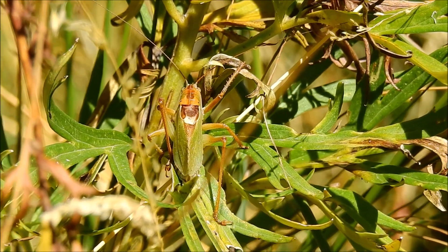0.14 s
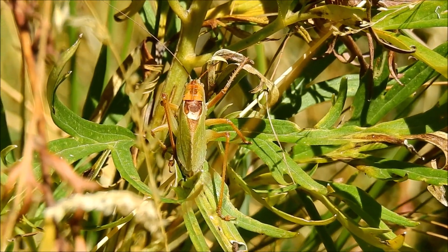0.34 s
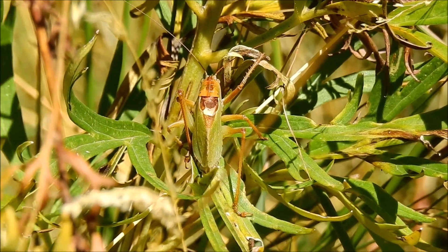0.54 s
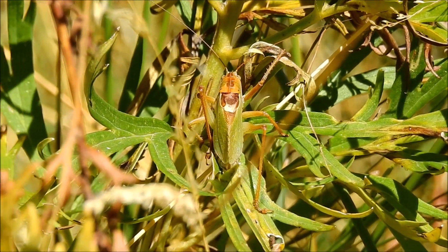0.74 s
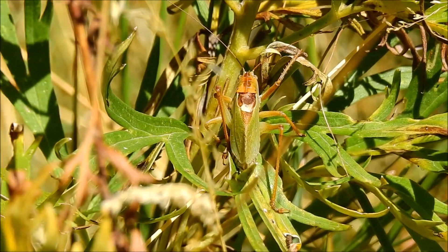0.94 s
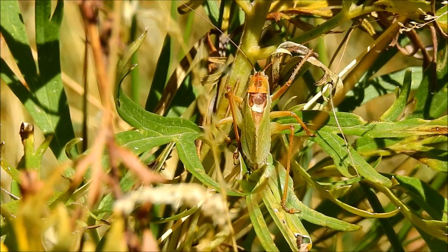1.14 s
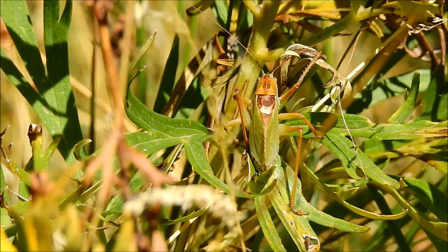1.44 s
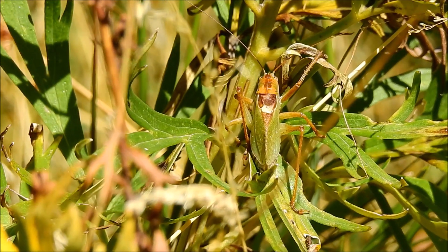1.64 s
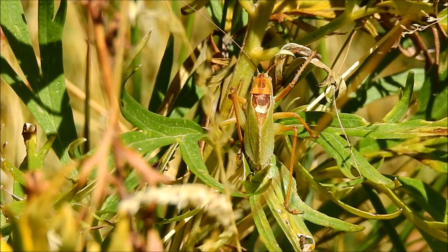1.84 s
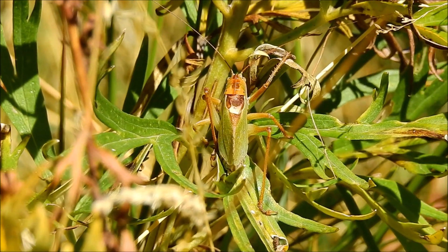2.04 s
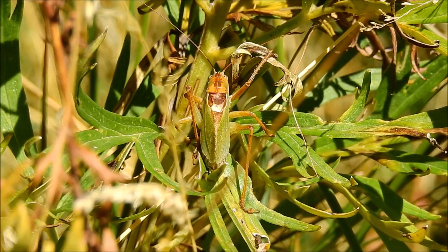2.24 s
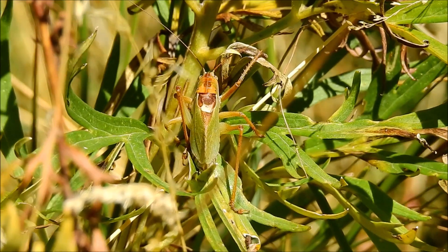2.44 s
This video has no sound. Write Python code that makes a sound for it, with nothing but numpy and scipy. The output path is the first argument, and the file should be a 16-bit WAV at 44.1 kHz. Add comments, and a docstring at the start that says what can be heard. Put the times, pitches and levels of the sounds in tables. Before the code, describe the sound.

A bush-cricket's rapid pulsed high buzz swells then stops, over fainter insects and wind thumps

```python
"""Wind thumps two microphone ports from the start, while a bird gives gliding whistles for 0.7 s.
A bush-cricket draws scraper over file about 29 times a second, growing louder until it stops at 1.7 s.
A neighbour, with its own tooth clicks and a narrower song, sings from 0.15 s to 2.1 s.
Two far crickets, with their own stroke rates, grow prominent towards the end; a hollow tap falls at 2.1 s.
Filtered noise forms a hush and an insect chorus throughout, and a rustle that swells at the close."""
import sys
import numpy as np
from scipy import signal
from scipy.fft import rfft, irfft
from scipy.io import wavfile
from scipy.ndimage import uniform_filter1d

SR = 44100
rng = np.random.default_rng(int(sys.argv[2]) if len(sys.argv) > 2 else 0)


def wav_record(signal):
    """Record a signal, one row per channel, as 16-bit PCM in the file named by sys.argv[1]."""
    frames = np.transpose(np.atleast_2d(signal))
    bounded = np.clip(frames, -1, 1)
    # unit amplitude maps onto the largest positive 16-bit level
    quanta = np.round(bounded * 32767).astype(np.int16)
    wavfile.write(sys.argv[1], SR, quanta)


N = 114660
TIME = np.arange(N) / SR


def from_db(db):
    """Logarithmic level: decibels become an amplitude ratio."""
    return 10 ** (np.asarray(db) / 20)


def rms_one(x):
    """Normalisation: scale to a root-mean-square of 1."""
    return x / np.sqrt(np.mean(x ** 2) + 1e-20)


def in_time(rows):
    """Linear interpolation: a two-column curve at every sample."""
    return np.interp(TIME, *np.transpose(rows))


def bump(s, length):
    """Gaussian envelope of height 1 centred on s, down to exp(-2) at one length either side."""
    return np.exp(-2 * ((TIME - s) / length) ** 2)


def noise(spectrum):
    """Spectral shaping: two independent white noises take on the given spectrum; joint rms 1."""
    hz, db = np.transpose(spectrum)
    bins = np.maximum(np.arange(N // 2 + 1) * SR / N, 1)
    gain = from_db(np.interp(np.log(bins), np.log(hz), db))
    # beyond the listed frequencies the amplitude falls by 12 dB an octave
    gain = gain * np.minimum(bins / hz[0], 1) ** 2 * np.minimum(hz[-1] / bins, 1) ** 2
    return rms_one(irfft(rfft(rng.standard_normal((2, N))) * gain, N))


def spread(pair, side_db):
    """Stereo by sum and difference: one noise is the middle, the other the side."""
    middle, side = pair
    return rms_one(middle + from_db(side_db) * side * np.array([[1], [-1]]))


def resonate(x, hz, width):
    """Resonance: a steep-sided band passes while the rest is rejected."""
    band = [hz - width / 2, hz + width / 2]
    return signal.sosfilt(signal.butter(2, band, "band", fs=SR, output="sos"), x)


def evened(x, size):
    """Envelope division: the running rms over size samples is held near 1."""
    power = uniform_filter1d(np.abs(signal.hilbert(x)) ** 2, size) / 2
    return x / np.sqrt(power + 1e-12)


def stroke_times(pace):
    """Phase accumulation: the moment at which the stroke count reaches each whole number."""
    s, made = np.transpose(pace)
    return np.interp(np.arange(made[-1] + 1), made, s)


def tooth_clicks(teeth_per_s, rough_db, jitter=.25):
    """Impulse excitation: file teeth of uneven spacing and height click one after another."""
    gaps = np.exp(jitter * rng.standard_normal(N // 10)) / teeth_per_s
    teeth = (np.cumsum(gaps) * SR).astype(int)
    heights = from_db(rough_db * np.clip(rng.standard_normal(len(teeth)), -2, 2))
    return rms_one(np.bincount(teeth, heights, N)[:N])


def stridulate(strokes, wing, rise_s, fall_s, teeth_per_s, rough_db, scatter_db, tail_s,
               bass_lag_s=0, uneven_db=1.16):
    """Source and resonator: swelling strokes of clicks, part blurred by foliage to hiss, drive the wing."""
    clicks = tooth_clicks(teeth_per_s, rough_db)
    nearest = np.searchsorted((strokes[1:] + strokes[:-1]) / 2, TIME)
    strength = from_db(uneven_db * rng.standard_normal(len(strokes)))[nearest]
    wet = from_db(scatter_db)
    keep = np.exp(-1 / (tail_s * SR))
    scatter = wet * rng.standard_normal((2, N))   # different on each side

    hz, db = np.transpose(wing)
    bins = np.arange(N // 2 + 1) * SR / N
    response = rms_one(from_db(np.interp(bins, hz, db)) * np.minimum(bins / hz[0], 1) ** 2)

    spectrum = 0
    low = np.interp(bins, [7400, 8400], [1, 0])   # the lower part may come late in the stroke
    for band, delay in ((low, bass_lag_s), (1 - low, 0)):
        since = TIME - strokes[nearest] - delay
        rise = (since / rise_s) ** 2
        fall = np.abs(since / fall_s) ** 3
        pressure = strength * np.exp(-.5 * np.where(since < 0, rise, fall))
        # the blurred power decays exponentially with time constant tail_s
        blurred = np.sqrt(signal.lfilter([1 - keep], [1, -keep], pressure ** 2 + 1e-18))
        spectrum = spectrum + rfft(pressure * clicks + blurred * scatter) * band
    return irfft(spectrum * response, N) / np.hypot(1, wet)


# the near cricket's pace: t/s, strokes made so far
NEAR_PACE = [(.0206, 0), (.1561, 4), (.2968, 8), (.5407, 15), (.6065, 17), (.7783, 22), (1.1586, 33),
             (1.333, 38), (1.5467, 44), (1.6228, 46), (1.7315, 49)]
# its effort: t/s, level/dB
NEAR_LEVEL = [(0, -49), (.3, -47.5), (.55, -45.5), (.9, -45), (1.15, -43), (1.4, -39.5), (1.74, -40)]
# its wing's relative response: f/Hz, spectral level/dB
NEAR_WING = [(4000, -29), (5300, -21.5), (6400, -3.5), (7400, 5), (8500, 2), (9800, -6.5), (11000, -16.5),
             (13000, -26.5), (15800, -40)]
NEAR_STROKE = dict(rise_s=.0046, fall_s=.0052, teeth_per_s=1900, tail_s=.0021, bass_lag_s=.0012,
                   rough_db=1.5, scatter_db=1)
OPENING_DB, OPENING_DELAY_S = -17, .014   # relative to the closing stroke


def near_cricket():
    """Stridulation: loud closing strokes alternate with soft opening strokes of the same wing."""
    strokes = stroke_times(NEAR_PACE)
    closing = stridulate(strokes, NEAR_WING, **NEAR_STROKE)
    opening = stridulate(strokes[:-1] + OPENING_DELAY_S, NEAR_WING, **NEAR_STROKE)
    return from_db(in_time(NEAR_LEVEL)) * (closing + from_db(OPENING_DB) * opening)


# the neighbour's pace: t/s, strokes made so far
NEIGHBOUR_PACE = [(.149, 0), (.514, 12), (.789, 21), (1.034, 29), (1.646, 49), (1.866, 56), (2.063, 62)]
# its effort: t/s, level/dB
NEIGHBOUR_LEVEL = [(.12, -55), (.22, -50), (.45, -47.5), (1.0, -46.5), (1.25, -51.5), (1.6, -50.5),
                   (1.8, -48.5), (2.03, -49.5), (2.08, -58)]
# balance of its two resonances: t/s, upper over lower level/dB
NEIGHBOUR_TILT = [(.2, -15), (.7, -2), (1.0, 9), (1.8, 16)]
# relative response of its lower resonance: f/Hz, spectral level/dB
NEIGHBOUR_LOWER = [(5400, -28), (6500, -1.5), (6900, 0), (7700, -16), (10000, -27), (13000, -38)]
# relative response of its upper resonance: f/Hz, spectral level/dB
NEIGHBOUR_UPPER = [(6200, -24), (7100, 0), (7450, -0.5), (8000, -41), (10500, -29), (13000, -46)]
NEIGHBOUR_STROKE = dict(rise_s=.0028, fall_s=.0042, teeth_per_s=1300, tail_s=.006,
                        rough_db=3.0, scatter_db=4)


def neighbour():
    """Balance of two resonances: the narrower, slightly faster song brightens as it goes on."""
    strokes = stroke_times(NEIGHBOUR_PACE)
    tilt = from_db(in_time(NEIGHBOUR_TILT))
    lower = stridulate(strokes, NEIGHBOUR_LOWER, **NEIGHBOUR_STROKE)
    upper = stridulate(strokes, NEIGHBOUR_UPPER, **NEIGHBOUR_STROKE)
    song = (lower + tilt * upper) / np.hypot(1, tilt)   # the squared weights sum to 1
    return from_db(in_time(NEIGHBOUR_LEVEL)) * song


# the far crickets, slow then fast: t/s of one stroke, stroke rate f/Hz
FAR_CRICKETS = [ (2.281, 32.2), (2.499, 40.9), ]
# effort of the slow one: t/s, level/dB
FAR_SLOW_LEVEL = [(0, -59), (1.7, -55.5), (2.1, -54.5), (2.28, -51), (2.4, -53.5), (2.6, -51)]
# effort of the fast one: t/s, level/dB
FAR_FAST_LEVEL = [(0, -68.5), (1.7, -53.5), (2.0, -50), (2.3, -57), (2.45, -50.5), (2.57, -47.5)]
# relative response of their wings: f/Hz, spectral level/dB
FAR_WING = [(4000, -23), (5400, -17.5), (6500, -5), (7350, 2.5), (8400, -10), (9900, -18.5), (11200, -33),
            (15800, -35)]
FAR_STROKE = dict(rise_s=.004, fall_s=.0035, teeth_per_s=1500, tail_s=.0016,
                  rough_db=3.0, scatter_db=10)


def far_crickets():
    """Beating of two rates: songs of steady pace drift in and out of step."""
    out = 0
    for (s, rate), level in zip(FAR_CRICKETS, (FAR_SLOW_LEVEL, FAR_FAST_LEVEL)):
        strokes = np.arange(s % (1 / rate), N / SR + 1 / rate, 1 / rate)
        out = out + from_db(in_time(level)) * stridulate(strokes, FAR_WING, **FAR_STROKE)
    return out


# the bird's whistles, one curve each: t/s, f/Hz, level/dB
WHISTLES = [
    [(0, 5314, -57.5), (.026, 4905, -65.5), (.066, 4835, -64.5), (.136, 4980, -63.5), (.178, 4990, -66)],
    [(.335, 6060, -75), (.375, 5620, -68), (.43, 5150, -74)],
    [(.69, 4420, -74), (.725, 4200, -73)],
    [(.696, 5100, -70), (.712, 6600, -55)],
]
WHISTLE_FADE_S = 0.0045


def bird(waver=0.27):
    """Frequency glide: sinusoids of integrated phase, their amplitude wavering through the leaves."""
    out = 0
    for whistle in WHISTLES:
        s, hz, db = np.transpose(whistle)
        gate = np.clip(np.minimum(TIME - s[0], s[-1] - TIME) / WHISTLE_FADE_S + .5, 0, 1)
        phase = 2 * np.pi * np.cumsum(np.interp(TIME, s, hz)) / SR
        tone = np.sqrt(2) * np.sin(phase)   # rms 1
        out = out + gate * from_db(np.interp(TIME, s, db)) * tone
    return out * (1 + waver * noise([(15, -3), (120, -7)]))


def port_power(events):
    """Power addition: the squared swells of a table sum at the left and right port."""
    power = 0
    for s, length, left, right in events:
        power = power + (from_db([[left], [right]]) * bump(s, length)) ** 2
    return power


# wind buffets, before a common trim: t/s, length/s, left level/dB, right level/dB
GUSTS = [(0.07, 0.051, -44, -43.5), (0.155, 0.031, -71, -40.5), (0.222, 0.038, -35.5, -34),
         (0.25, 0.008, -26, -48), (0.28, 0.038, -34.5, -48), (0.425, 0.03, -33, -58),
         (0.495, 0.043, -27, -31.5), (0.562, 0.048, -28, -41.5), (0.705, 0.024, -45, -49.5),
         (0.78, 0.016, -30.5, -45), (0.89, 0.025, -44.5, -41.5), (0.968, 0.014, -51, -32),
         (1.002, 0.013, -67, -37.5), (1.08, 0.055, -50.5, -47), (1.158, 0.024, -32.5, -33.5),
         (1.29, 0.047, -42, -39.5), (1.4, 0.1, -47.5, -46.5), (1.466, 0.014, -58, -24.5),
         (1.603, 0.055, -31, -28), (1.762, 0.02, -35, -26), (1.812, 0.041, -29.5, -25.5),
         (1.847, 0.017, -27, -25), (1.91, 0.045, -40.5, -39.5), (1.968, 0.029, -34, -41),
         (2.036, 0.027, -35, -35), (2.19, 0.019, -41, -73), (2.305, 0.03, -36.5, -52),
         (2.34, 0.013, -44, -39.5)]
# wind between buffets: t/s, level/dB
BREEZE = [(0, -60), (.4, -48.5), (.7, -56), (1.3, -58), (1.7, -56), (2.0, -48), (2.15, -54), (2.36, -50.5),
          (2.45, -66), (2.6, -73)]
# relative spectrum of the thumps, before the low cut: f/Hz, spectral level/dB
RUMBLE = [(22, -28), (35, -17), (55, -1.5), (85, 2), (110, 2.5), (150, -10.5), (200, -20), (260, -34),
          (400, -69.5), (800, -57.5)]
# brighter puffs: t/s, length/s, left level/dB, right level/dB
PUFFS = [(.249, 0.0039, -37.5, -68), (.488, 0.0061, -44, -68), (.508, 0.007, -50.5, -68),
         (.562, 0.014, -49.5, -73), (1.163, 0.01, -56, -58), (1.812, .012, -57, -47)]
# relative spectrum of the puffs: f/Hz, spectral level/dB
FLUTTER = [(120, -38), (250, 15.5), (500, 2), (1000, -8.5), (2500, -17), (6000, -36)]
WIND_LOW_CUT_HZ = 26


def wind(gust_db=0.37):
    """Turbulent pressure: eddies thump each port separately, with brief brighter puffs."""
    gust_power = from_db(gust_db) ** 2 * port_power(GUSTS)
    pressure = np.sqrt(gust_power + from_db(in_time(BREEZE)) ** 2)
    low_cut = signal.butter(2, WIND_LOW_CUT_HZ, "high", fs=SR, output="sos")
    thumps = signal.sosfilt(low_cut, pressure * evened(noise(RUMBLE), size=650))
    return thumps + np.sqrt(port_power(PUFFS)) * noise(FLUTTER)


HUSH_SIDE_DB = -9.5   # side relative to middle, for hush and rustle
# a rustle that swells at the end: t/s, level/dB
RUSTLE_LEVEL = [(2.2, -86), (2.36, -70.5), (2.48, -63), (2.6, -61)]
# its relative spectrum: f/Hz, spectral level/dB
RUSTLE = [(150, -1), (300, -2.5), (550, 0), (800, -1.5), (1200, -2.5), (1700, -8), (3000, -10.5),
          (6000, -26)]


def rustle():
    """Amplitude-modulated noise: a broad rustle swells at the end."""
    return from_db(in_time(RUSTLE_LEVEL)) * spread(noise(RUSTLE), HUSH_SIDE_DB)


TAP_S, TAP_LENGTH_S, TAP_HZ, TAP_WIDTH_HZ, TAP_DB = 2.127, 0.013, 550, 84, -56


def tap():
    """Narrow-band burst: resonant noise under a short swell gives a faint hollow tap."""
    ringing = resonate(rng.standard_normal(N), TAP_HZ, TAP_WIDTH_HZ)
    return from_db(TAP_DB) * bump(TAP_S, TAP_LENGTH_S) * evened(ringing, size=600)


# relative spectrum of many distant insects: f/Hz, spectral level/dB
CHORUS = [(2500, -37.5), (4000, -25), (5200, -11), (6300, -0.5), (7200, 0), (8200, -6), (10000, -19),
          (12000, -26), (15500, -45)]
CHORUS_DB, CHORUS_SIDE_DB = -58.5, 6


def chorus():
    """Incoherent superposition: the blur of many distant insects is a steady band of noise."""
    return from_db(CHORUS_DB) * spread(noise(CHORUS), CHORUS_SIDE_DB)


# the outdoor hush: t/s, level/dB
HUSH_LEVEL = [(0, -66), (.9, -65.5), (1.4, -63.5), (1.9, -63.5), (2.33, -62), (2.6, -63)]
# its relative spectrum: f/Hz, spectral level/dB
HUSH = [(60, 12), (190, 3.5), (290, -5), (400, 1.5), (600, 2.5), (800, -1.5), (1200, -4.5), (2000, -7.5),
        (3300, -9), (5500, -7.5)]


def hush():
    """Diffuse background: low noise, nearly alike on both sides, slowly changes level."""
    return from_db(in_time(HUSH_LEVEL)) * spread(noise(HUSH), HUSH_SIDE_DB)


CRICKET_PAN_DB = -1.1   # left relative to right


def scene():
    """Linear superposition: crickets, bird, wind and background add, balanced left to right."""
    crickets = near_cricket() + neighbour() + far_crickets()
    crickets = crickets * from_db([[CRICKET_PAN_DB / 2], [-CRICKET_PAN_DB / 2]])
    background = (rustle() + hush()) * from_db([[-.4], [.4]])
    return crickets + bird() + wind() + background + tap() + chorus()


CUTOFF_HZ = 15800


def record(dry):
    """Band limitation: an elliptic low-pass cuts the top steeply."""
    return signal.sosfilt(signal.ellip(12, .1, 80, CUTOFF_HZ, fs=SR, output="sos"), dry)


dry = scene()
out = record(dry)
wav_record(out)
```